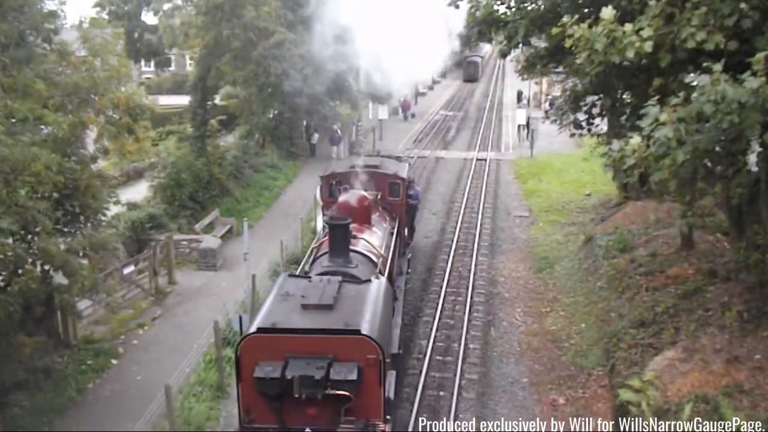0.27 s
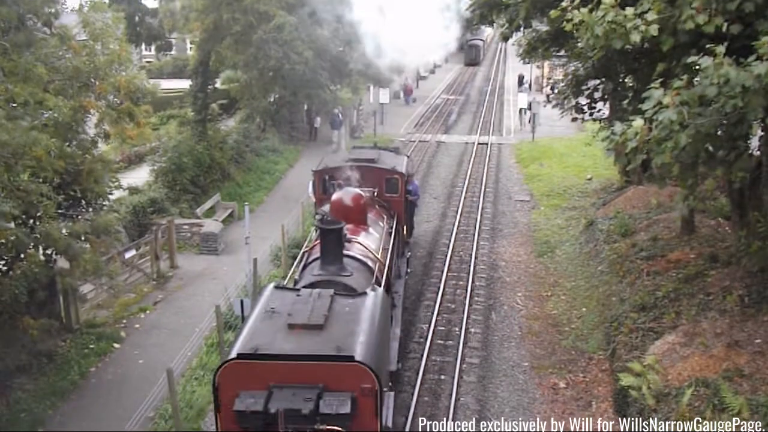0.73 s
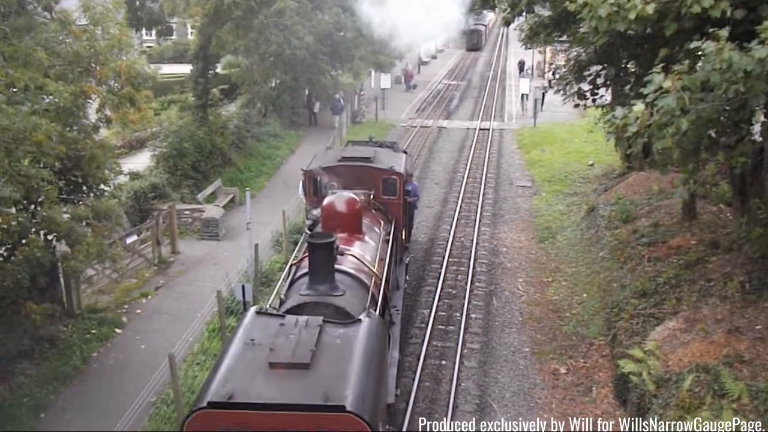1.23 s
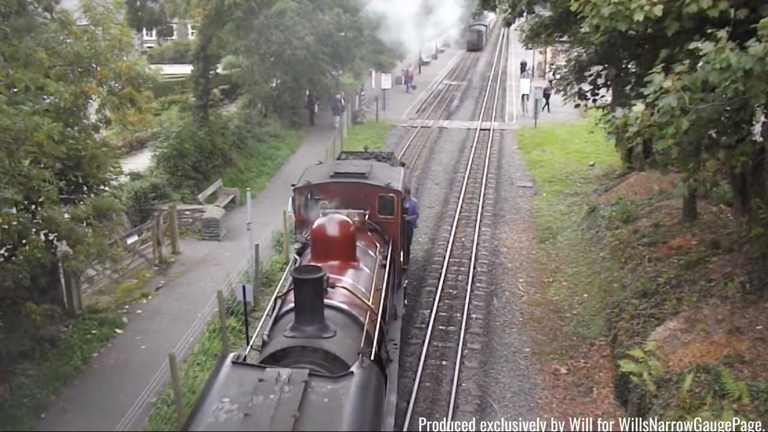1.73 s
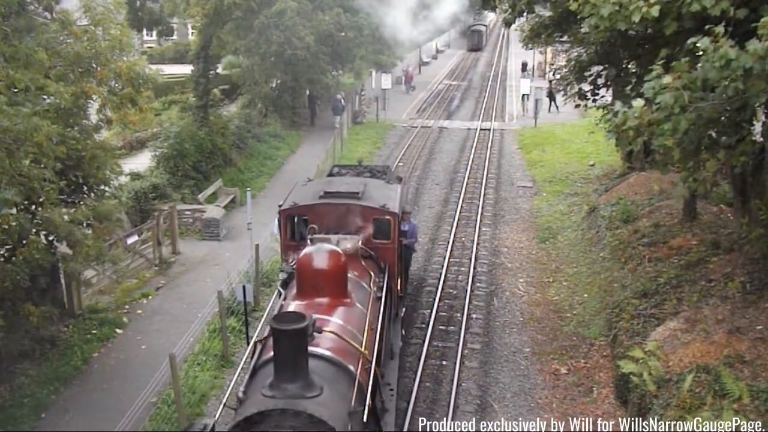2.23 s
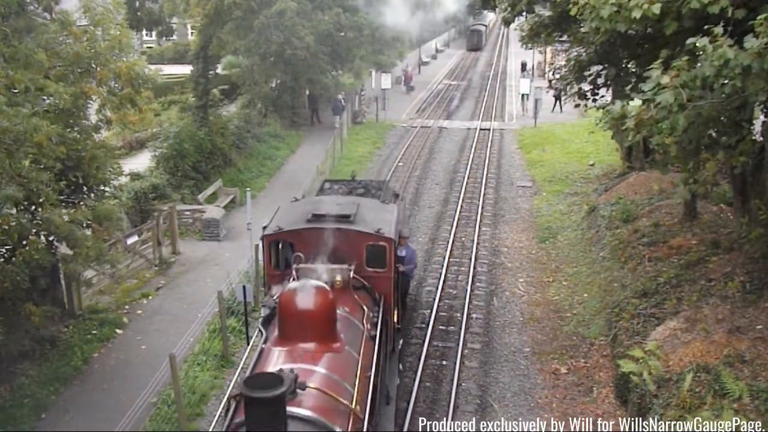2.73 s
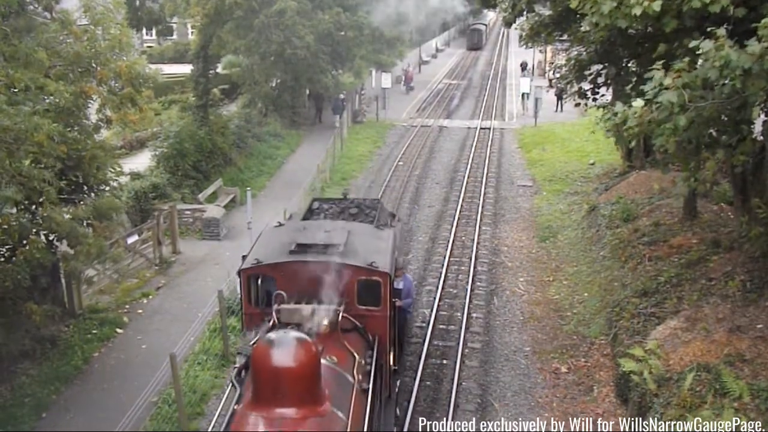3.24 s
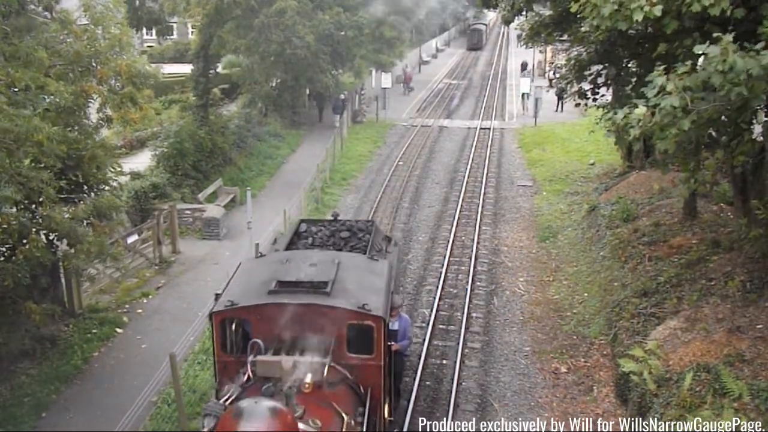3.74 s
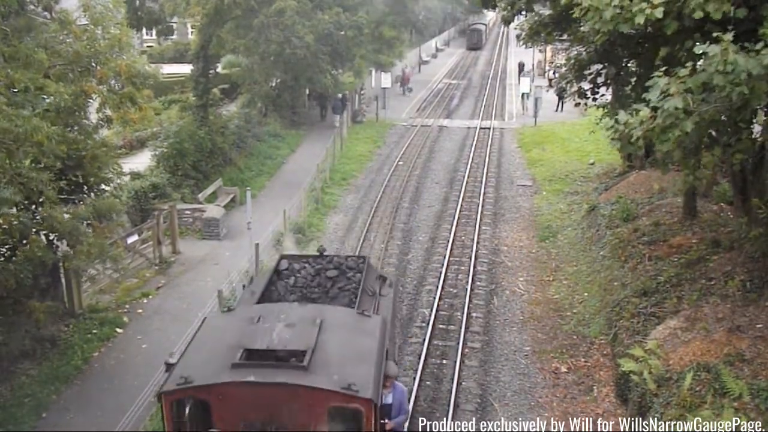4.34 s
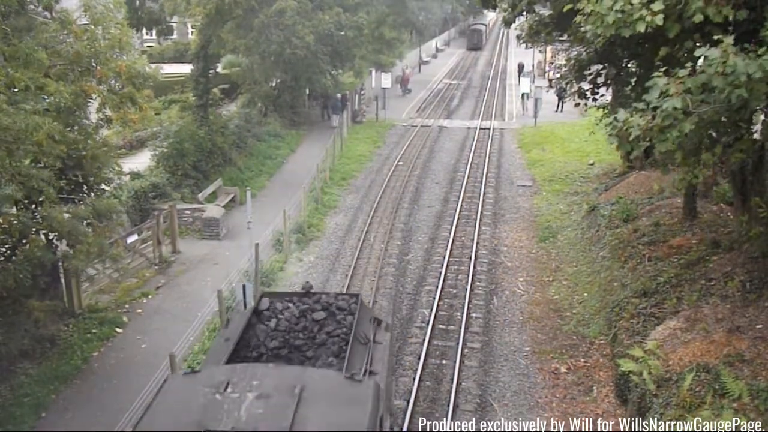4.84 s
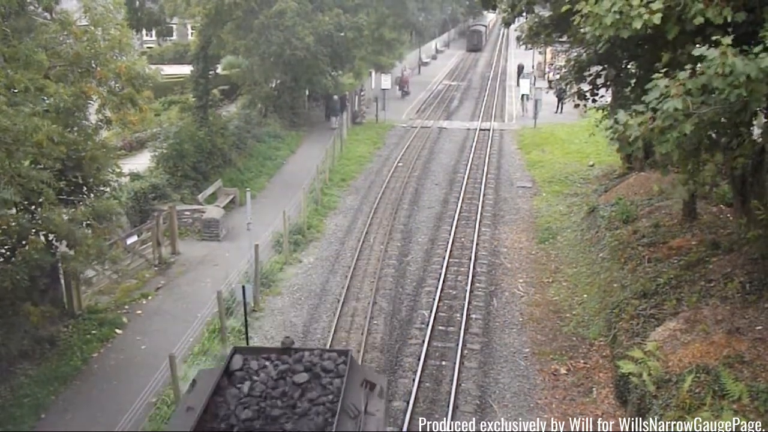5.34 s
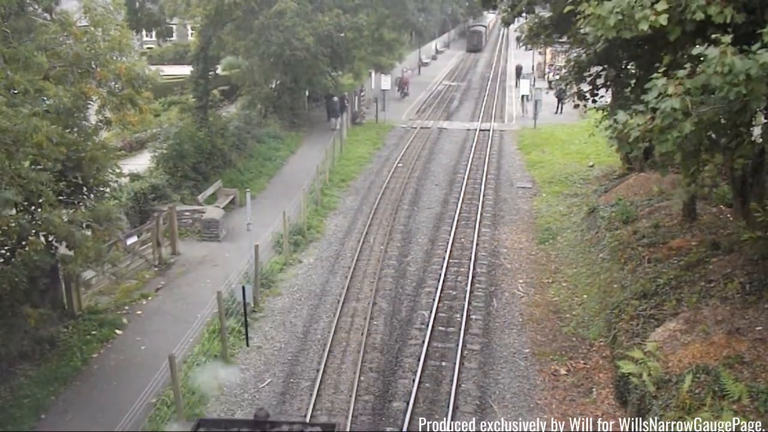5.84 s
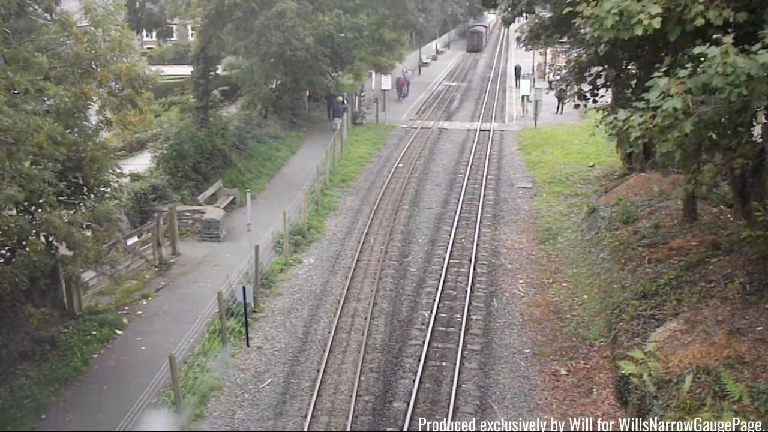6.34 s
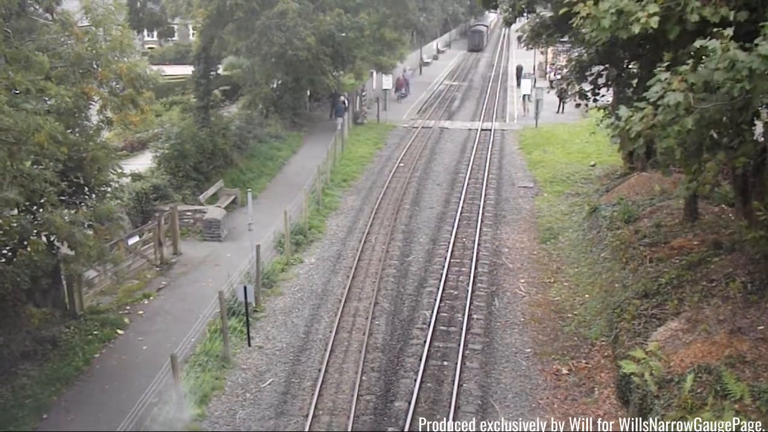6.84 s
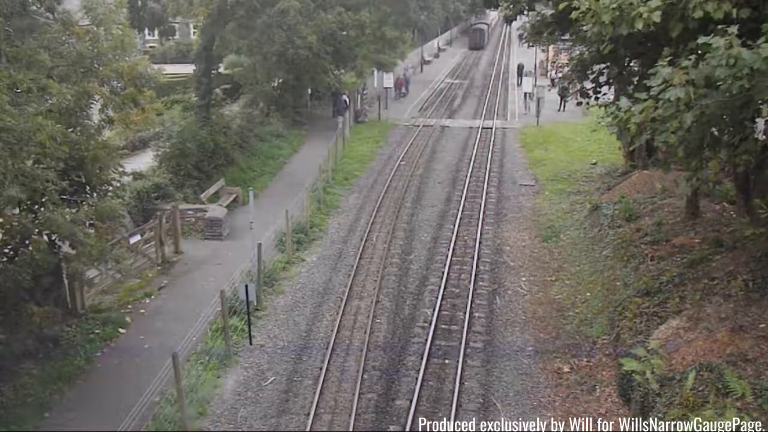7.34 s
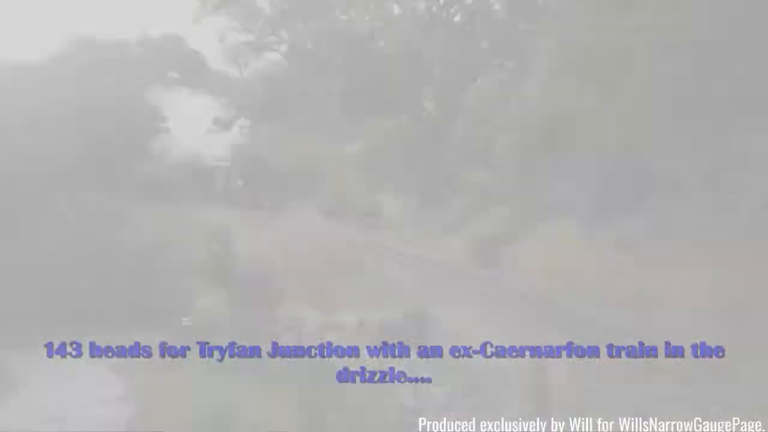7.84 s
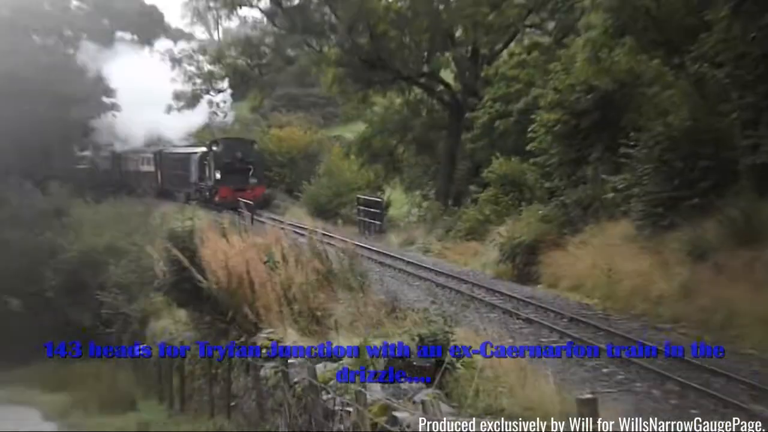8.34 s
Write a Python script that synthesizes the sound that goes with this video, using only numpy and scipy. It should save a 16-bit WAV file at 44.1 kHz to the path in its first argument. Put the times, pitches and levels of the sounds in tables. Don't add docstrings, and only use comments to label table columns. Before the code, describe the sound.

Outdoors from a footbridge, one close microphone hears a small steam engine roll underneath. Loud tearing steam hiss with a hollow pipe-like whistle colour swells, sputters around four seconds, then drops abruptly as the bridge covers it. Slow soft puffs, low wheel rumble and thuds over rail joints follow, the strongest near 5.7 seconds. Everything fades before eight seconds into very quiet drizzle, leaf rustle and small drips close by.

```python
import sys
import numpy as np
from scipy import signal
from scipy.fft import rfft, irfft, next_fast_len
from scipy.io import wavfile
from scipy.ndimage import uniform_filter1d, map_coordinates

SR = 44100
rng = np.random.default_rng(int(sys.argv[2]) if len(sys.argv) > 2 else 0)


def voltage_ratio(decibels):
    exponent = np.asarray(decibels, float) / 20
    return 10 ** exponent


def waveform_to_disk(signal):
    frames = np.transpose(np.atleast_2d(signal))
    scaled = np.clip(frames, -1, 1) * 32767
    samples = np.round(scaled).astype(np.int16)
    wavfile.write(sys.argv[1], SR, samples)


N = 378378
TIME = np.arange(N) / SR
CLOCK = np.arange(0, N + 32, 32) / SR

# (frequency [Hz], width [Hz], level [dB])
UPPER_PIPE = [(4130, 325, 4), (3650, 450, -3)]
LOWER_PIPE = [(1796, 66, 6), (1948, 278, 9)]
# (frequency [Hz], density [dB per Hz])
JET_COLOUR = [(1900, -41), (2250, 1), (3300, 1.5), (4500, -8), (5200, -7.5), (7000, -50)]
# (frequency [Hz], width [Hz], level [dB])
FRAME_MODES = [(793, 150, 0), (1080, 280, 3), (1380, 370, -1)]
# (frequency [Hz], width [Hz], level [dB])
GLAND_MODES = [
    [(6600, 800, 0)],
    [(7480, 570, 1.5), (8490, 580, 2)],
    [(9600, 1300, 0)],
    [(11100, 530, 4), (12340, 840, 2.5), (15000, 1200, -6.5)],
]
# (facing time [s], peak level [dB], 6 dB rise [s], 6 dB fall [s])
BEAMS = dict( upper=[(.35, -27.5, 1, 0.14), (1.9, -22, 1.13, 1.65), (3.7, -20.5, 1.3, .55)],
         lower=[(.1, -31.5, 3, .5), (1.9, -26.5, 1.5, 2), (4.05, -28.5, 0.56, 0.9)],
         broad=[(2.5, -25.5, 1.8, 1.34), (4.1, -29, 0.2, .4)], roar=[(1.8, -33.5, 3, 2.5),
         (4.12, -27, 0.9, 0.7)], leaks=[[(2.55, -24.5, 1.7, 1.8)], [(.1, -29, .3, 0), (2.65, -23, 0.7, 1),
         (3.7, -23.5, 0.3, 0.9)], [(.1, -25.5, -2, 0.6), (1.0, -24.5, 0.3, 0.5), (3.2, -26, 1.1, 1.5)],
         [(.1, -30.5, .5, 0.8), (.95, -24.5, 0.1, 2), (3.0, -25.5, 1.8, 2)]], cloud=[(1.0, -25, 4, 2.5),
         (4.1, -22, 0.65, 0.58), (4.9, -30.5, -1.5, 4)], deck=[(1.5, -39.5, 5, 3), (4.45, -30, .5, 0.54),
         (5.1, -32, .5, 2.08)], rumble=[(1.6, -41.5, 1.5, 2.4), (4.25, -38.5, .5, .6),
         (5.0, -39.5, 1.6, 2)])
# (time [s], loss [dB], recovery [s])
CHOKES = [
    (1.872, 7, .014),
    (2.838, 5, .03),
    (4.103, 8, .035),
    (4.195, 7, .04),
    (4.277, 5, .025),
    (4.337, 9, .06),
]
SURGE_DB = 0.2


def steam():
    choke = SURGE_DB * wobble(9)
    for s, loss_db, recovery in CHOKES:
        choke = choke - loss_db * edge(s, 0.003) * np.exp(-np.abs(CLOCK - s) / recovery)
    eddies = 1.3 * wobble(42) + 0.6 * wobble(80)
    eddies = eddies - uniform_filter1d(eddies, size=64)

    upper = rush(peaks(UPPER_PIPE), patchy_db=0.2, flutter=fine(eddies))
    lower = rush(peaks(LOWER_PIPE), patchy_db=0.5, flutter=fine(0.8 * eddies))
    broad = voltage_ratio(1.06) * rush(slope(JET_COLOUR), patchy_db=-0.9, flutter=fine(1.25 * eddies))
    roar = voltage_ratio(-2.5) * rush(peaks(FRAME_MODES), patchy_db=1.5, flutter=fine(0.37 * eddies))

    out = flow(0.95, BEAMS["upper"], choke) * upper
    out += flow(0.8, BEAMS["lower"], choke) * lower
    out += flow(1.0, BEAMS["broad"], choke) * broad
    out += flow(0.3, BEAMS["roar"], choke) * roar
    for lobes, modes in zip(BEAMS["leaks"], GLAND_MODES):
        flutter = fine(eddies + 0.34 * wobble(35))
        out += flow(0.72, lobes, choke) * rush(peaks(modes), patchy_db=1.0, flutter=flutter)
    return out


HIDDEN_S, HIDDEN_DB, HIDING_DB_PER_S = 4.5, 6.5, 8
OWN_DB = 0.45


def flow(share, lobes, choke_db):
    late = np.maximum(CLOCK - HIDDEN_S, 0)
    shadow_db = HIDDEN_DB * np.minimum(late / 0.022, 1) + HIDING_DB_PER_S * late
    return fine(beam(lobes) + share * choke_db + OWN_DB * wobble(30.04) - shadow_db)


# (frequency [Hz], density [dB per Hz])
CLOUD_COLOUR = [(2820, -28), (4800, -1), (6760, -1.5), (7480, 0.5), (11500, -3), (14000, -6), (15200, -14)]
DECK_COLOUR = [(440, -31), (750, -6.5), (852, -1.5), (1370, -9), (1880, -0.5), (2300, -7.5), (2940, -3.5),
               (3230, -5), (4270, -0.5), (5000, -14), (6500, -33), (11000, -120)]
RUMBLE_COLOUR = [(15, -55), (25, -25), (54, -13), (124, -16), (176, -8), (430, -3), (474, -1), (700, -5),
                 (910, -27), (1540, -120)]
# (time [s], length [s], gain [dB])
PUFFS = [
    (5.0, 0.39, 3.5),
    (5.9, 0.32, 3.5),
    (6.74, 0.32, 4),
    (7.56, 0.24, 0.5),
]
PUFF_RISE_S, PUFF_FALL_S = 0.06, 0.039
DECK_PUFF = 0.41
FADE_START_S, FADE_END_S, FADE_BEND = 7.65, 8.37, 1.5


def passing():
    puff_db = 0
    for s, length, db in PUFFS:
        puff_db = puff_db + db * (edge(s, PUFF_RISE_S) - edge(s + length, PUFF_FALL_S))
    cloud = rush(slope(CLOUD_COLOUR), patchy_db=1.0, flutter=fine(0.16 * wobble(22)))
    deck = rush(slope(DECK_COLOUR), patchy_db=0.4)
    rumble = rush(slope(RUMBLE_COLOUR), patchy_db=2.0, flutter=fine(0.57 * wobble(11)))

    out = fine(beam(BEAMS["cloud"]) + puff_db) * cloud
    out += fine(beam(BEAMS["deck"]) + DECK_PUFF * puff_db) * deck
    out += fine(beam(BEAMS["rumble"])) * rumble
    fade = np.clip((FADE_END_S - TIME) / (FADE_END_S - FADE_START_S), 0, 1)
    return out * fade ** FADE_BEND


# (time [s], peak level [dB], centre [Hz], 60 dB decay [s])
JOINTS = [(1.659, -23, 704, .1), (1.944, -20.5, 492, 0.085), (3.899, -25, 756, 0.11),
          (5.019, -26, 328, 0.19), (5.634, -17, 254, 0.095), (5.64, -20, 930, .08),
          (5.647, -17, 334, 0.081), (5.662, -20, 678, 0.11), (5.682, -23, 860, 0.083),
          (5.809, -31, 345, 0.087), (5.857, -25, 860, .06), (5.98, -24.5, 532, 0.16),
          (6.439, -26.5, 605, 0.18), (6.479, -29, 596, 0.092), (7.149, -29, 415, 0.13),
          (7.461, -27, 450, 0.1), (7.93, -35, 700, .06), (5.652, -20, 520, .1)]


def joints():
    out, t = np.zeros(N + SR), np.arange(SR // 4) / SR
    for s, db, hz, t60 in JOINTS:
        band = signal.butter(2, [hz / 2.1, hz * 2.0], "bandpass", fs=SR)
        burst = unit(signal.lfilter(*band, rng.standard_normal(len(t))))
        thud = burst + 1.1 * np.sin(2 * np.pi * hz * t)
        envelope = voltage_ratio(db - 4.5 - 60 * t / t60) * (1 - np.exp(-t / 0.003))
        out[round(s * SR):][:len(t)] += envelope * thud
    return out[:N] + squeak()


# (time [s], length [s], level [dB], start pitch [Hz], end pitch [Hz])
SQUEAK = (1.945, .038, -27, 520, 1050)


def squeak():
    out, t = np.zeros(N), np.arange(SR // 4) / SR
    s, length, db, low_hz, high_hz = SQUEAK
    u = np.clip(t / length, 0, 1)
    phase = 2 * np.pi * np.cumsum(low_hz + (high_hz - low_hz) * u) / SR
    out[round(s * SR):][:len(t)] += voltage_ratio(db) * np.sin(np.pi * u) * np.sin(phase)
    return out


# (time [s], peak level [dB],
# pitch [Hz], broad snap [dB], 60 dB decay [s])
DROPS = [
    (8.1, -27, 594, 3, 0.015),
    (8.101, -29, 3400, 2, .015),
    (8.102, -31, 5200, 4, 0.013),
    (8.155, -34, 1220, 1, .017),
    (8.158, -32, 2100, 0, .015),
    (8.163, -29, 720, -2, 0.019),
    (8.243, -24, 800, -4, 0.013),
    (8.242, -25, 2930, -6, 0.015),
         (8.166, -35, 3700, -8, .02),
    (8.215, -45, 4700, -12, .02),
    (8.266, -44, 4500, -12, .02),
    (8.297, -29, 3600, -9, 0.017),
    (8.347, -30, 3480, -9, .017),
    (8.47, -41, 4800, -12, .02),
    (8.52, -41, 8000, -12, .02),
    (8.57, -29, 3600, -8, .018),
]


def drops():
    out, t = np.zeros(N + SR), np.arange(SR // 20) / SR
    band = signal.butter(2, [900, 7000], "bandpass", fs=SR)
    for s, db, hz, snap_db, t60 in DROPS:
        note = np.sin(2 * np.pi * hz * t) + 0.51 * np.sin(2 * np.pi * 1.1 * hz * t)
        snap = voltage_ratio(snap_db) * unit(signal.lfilter(*band, rng.standard_normal(len(t))))
        envelope = voltage_ratio(db + 1.5 - 60 * t / t60) * (1 - np.exp(-t / 0.0025))
        out[round(s * SR):][:len(t)] += envelope * (note + snap)
    return out[:N]


# (time [s], level [dB])
LINESIDE = [
    (7.6, -88),
    (7.9, -49.5),
    (8.2, -48),
    (8.58, -48.5),
]
# (frequency [Hz], density [dB per Hz])
AIR_COLOUR = [(30, -16), (150, -6), (500, -1.5), (1050, -0.5), (1500, -4), (2500, -11), (3600, -6),
              (4400, -14.5), (6500, -19), (10500, -18), (13800, -17), (15700, -40)]
# (frequency [Hz], width [Hz], level [dB])
FAR_STEAM = [(1080, 70, -4), (1420, 50, -5), (2930, 100, 5), (9770, 25, -3)]


def lineside():
    times, db = np.transpose(LINESIDE)
    level = voltage_ratio(np.interp(TIME, times, db))
    air = lambda hz: slope(AIR_COLOUR)(hz) + voltage_ratio(-5) * peaks(FAR_STEAM)(hz)
    return level * (rush(air, patchy_db=0.8) + motor())


# (frequency [Hz], level [dB], lead [turns])
MOTOR_MODES = [(13200, 10, .29), (11850, 8, .77)]
TICKS = 94.6


def motor():
    out = 0
    drift = lambda rate: np.interp(TIME, CLOCK, wobble(rate))
    for hz, db, lead in MOTOR_MODES:
        since = ((TIME * TICKS + lead + 0.06 * drift(40)) % 1) / TICKS
        size = voltage_ratio(db + 3.1 * drift(90) - 60 * since / 0.01) * (1 - np.exp(-since / 0.00074))
        out = out + size * np.sin(2 * np.pi * hz * TIME + 1.2 * drift(90))
    return out


def rush(response, patchy_db, flutter=1):
    z = signal.stft(rng.standard_normal(N), nperseg=512)[2]
    field = uniform_filter1d(rng.standard_normal(z.shape), size=6, axis=0)
    field = uniform_filter1d(field, size=4, axis=1)
    noise = signal.istft(z * voltage_ratio(patchy_db * unit(field)), nperseg=512)[1][:N]
    return unit(flutter * filtered(noise, response))


def beam(lobes):
    power = 0
    for s, db, rise, fall in lobes:
        turned = (CLOCK - s) / np.where(CLOCK < s, rise, fall)
        power = power + (voltage_ratio(db) / (1 + turned ** 2)) ** 2
    return 10 * np.log10(power)


def edge(s, width):
    return 0.5 + 0.5 * np.tanh((CLOCK - s) / width)


def wobble(rate):
    return map_coordinates(rng.standard_normal(int(N * rate / SR) + 4), [CLOCK * rate])


def fine(db):
    return np.interp(TIME, CLOCK, voltage_ratio(db))


def unit(x):
    return x / np.sqrt(np.mean(x ** 2) + 1e-20)


def filtered(x, response):
    m = next_fast_len(N + 8192)
    return irfft(rfft(x, m) * response(np.fft.rfftfreq(m, 1 / SR)), m)[..., :N]


def slope(points):
    f, db = np.transpose(points)
    return lambda hz: voltage_ratio(np.interp(np.log(hz + 1), np.log(f + 1), db))


def peaks(modes):
    return lambda f: np.sqrt(sum(voltage_ratio(2 * db) / (1 + ((f - c) / w) ** 2) ** 2 for c, w, db in modes))


# (frequency [Hz], width [Hz], level [dB])
PARAPET_MODES = [(527, 60, -7), (835, 20, 0), (965, 22, 0), (1186, 16, -1), (1340, 18, 0), (1464, 18, -1),
                 (1600, 16, -4), (1822, 25, -12)]


def scene():
    dip = lambda hz: 0.75 / (1 + ((hz - 5300) / 220) ** 2)
    close = np.interp(TIME, [0.5, 2.3, 3.9, 4.3], [0.033, 0.66, 0.42, 0.49])
    engine = steam() + passing()
    engine = engine - close * filtered(engine, dip)
    above = np.interp(TIME, [3.2, 4.6], [1.05, 0.35])
    engine = engine + above * filtered(engine, peaks(PARAPET_MODES))
    return np.tile(engine + joints() + drops() + lineside(), (2, 1))


def low_pass(x):
    return signal.sosfilt(signal.butter(12, 15720, fs=SR, output="sos"), x)


TOP_HZ = 15720


def record(dry):
    notch = lambda hz: 1 - 0.65 / (1 + ((hz - 6990) / 45) ** 2)
    colour = lambda hz: notch(hz) * (hz < TOP_HZ) * hz ** 2 / (hz ** 2 + 35 ** 2)
    mid = filtered(dry[0], colour)
    mid = mid / (1 + np.abs(mid / 0.8) ** 4) ** (1 / 4)
    side = filtered(mid, lambda hz: -1j * np.tan(np.pi * np.minimum(hz, TOP_HZ) / SR))

    hz, s, z = signal.stft([mid, side], SR, nperseg=2048)
    hz = hz[:, None]
    power = uniform_filter1d(np.abs(z) ** 2, size=16, axis=1)
    strong = power[1] > voltage_ratio(-20.5) * power[0].mean(axis=0)
    kept = strong & (hz > 2700) | (hz > 5800)
    blur = np.exp(0.3j * rng.standard_normal(kept.shape))
    top = (hz < 15160) | (s < 3.2) | (rng.random(len(s)) < 0.22)
    mid, side = signal.istft([z[0] * top, z[1] * kept * blur], SR, nperseg=2048)[1][:, :N]
    return low_pass(np.array([mid + side, mid - side]))


dry = scene()
out = record(dry)
waveform_to_disk(out)
```